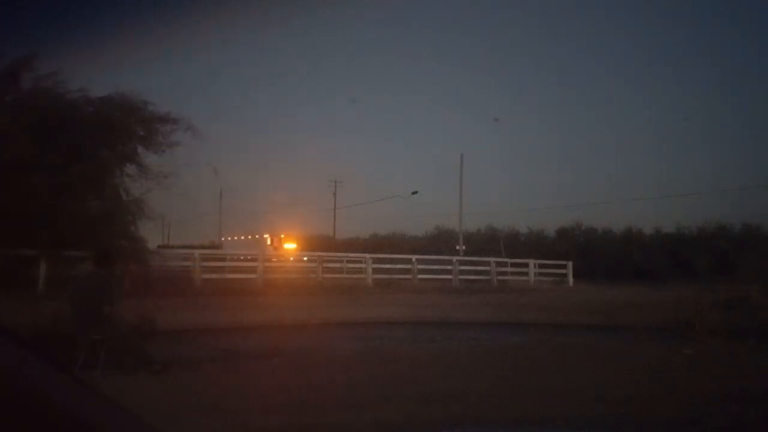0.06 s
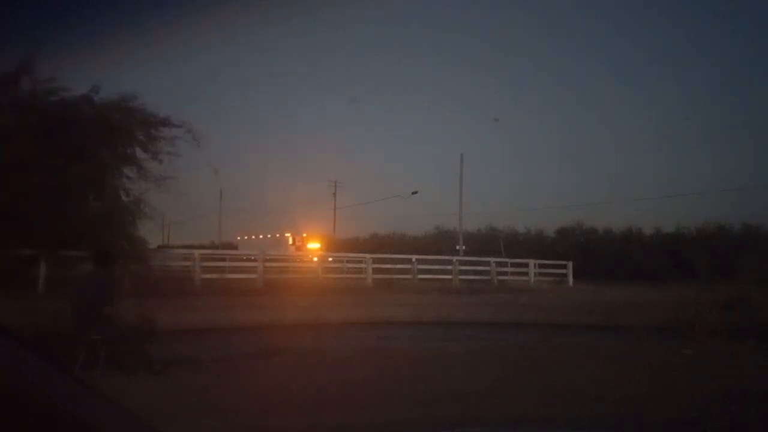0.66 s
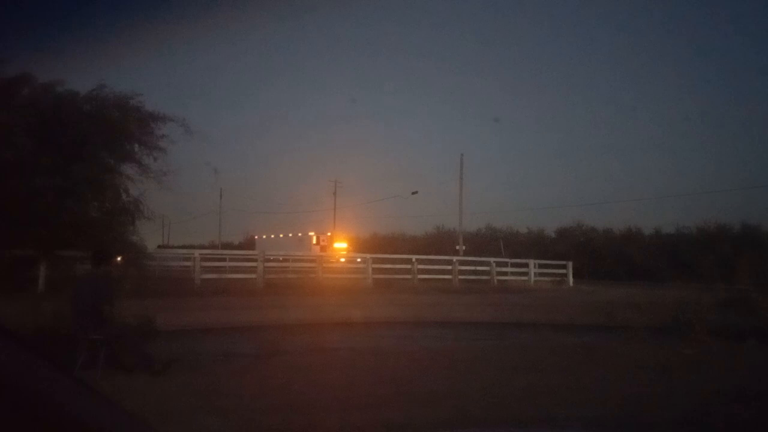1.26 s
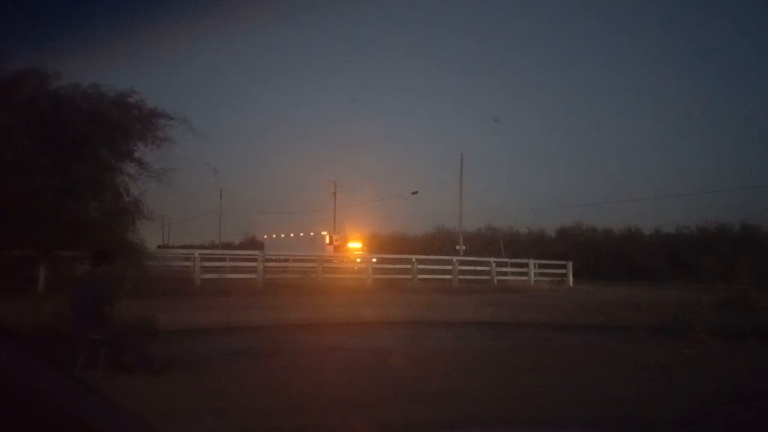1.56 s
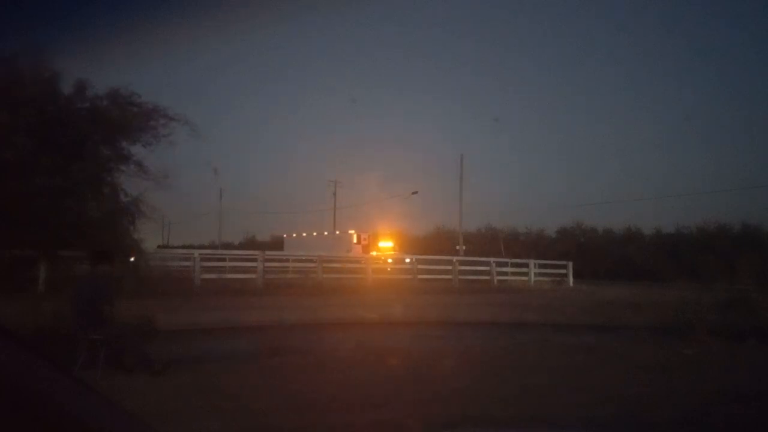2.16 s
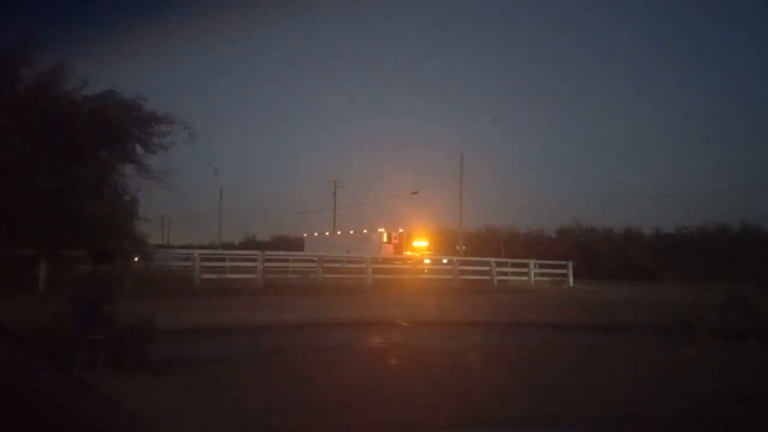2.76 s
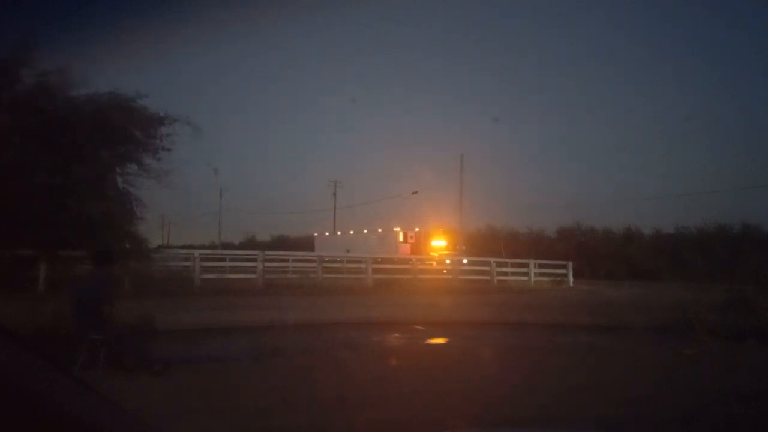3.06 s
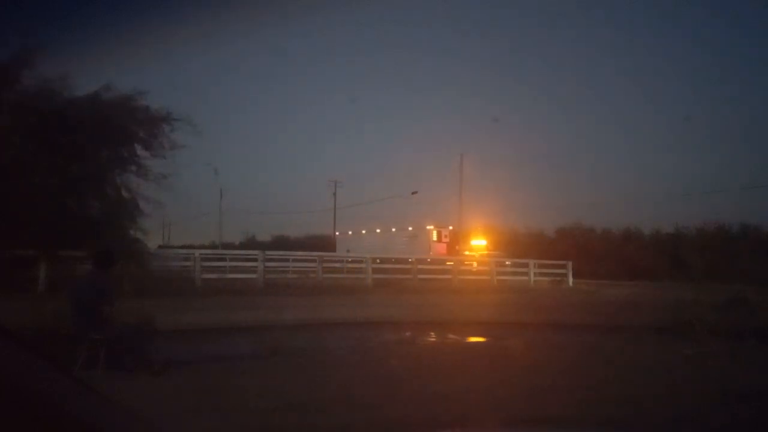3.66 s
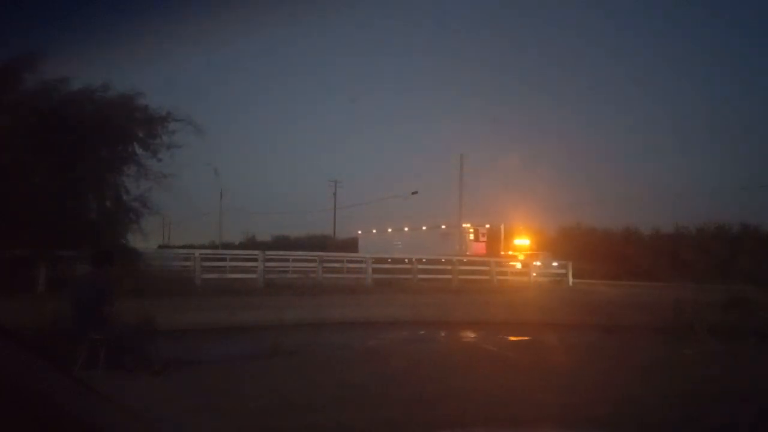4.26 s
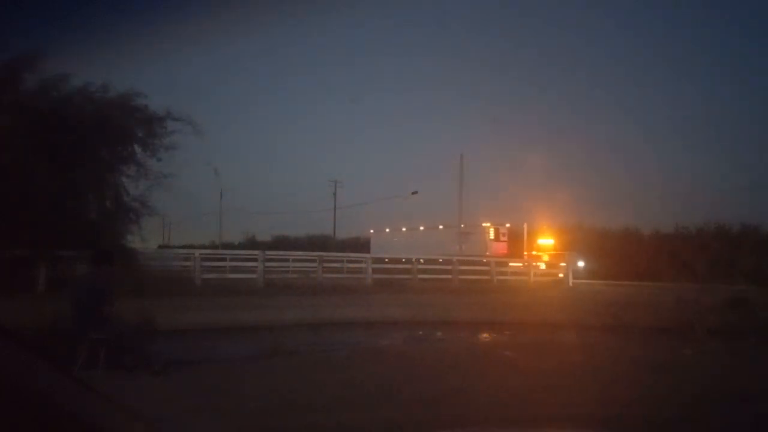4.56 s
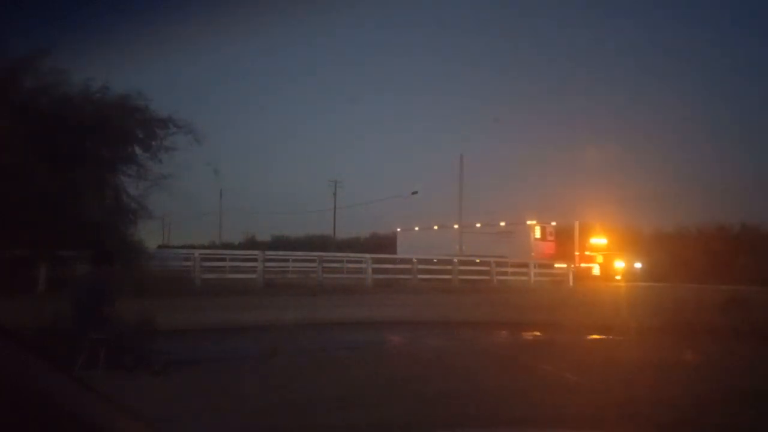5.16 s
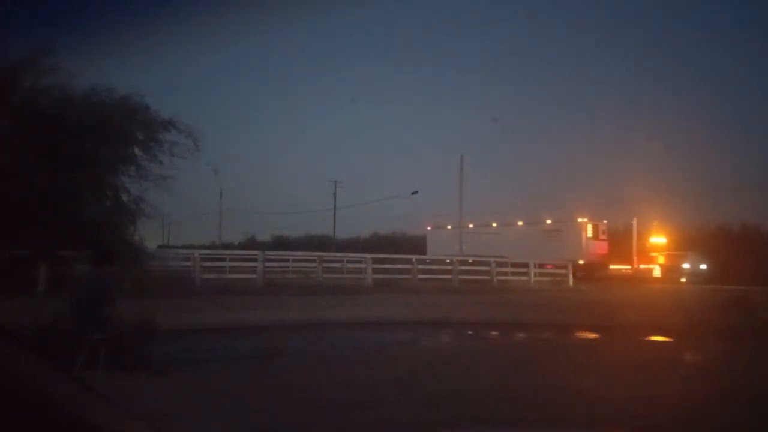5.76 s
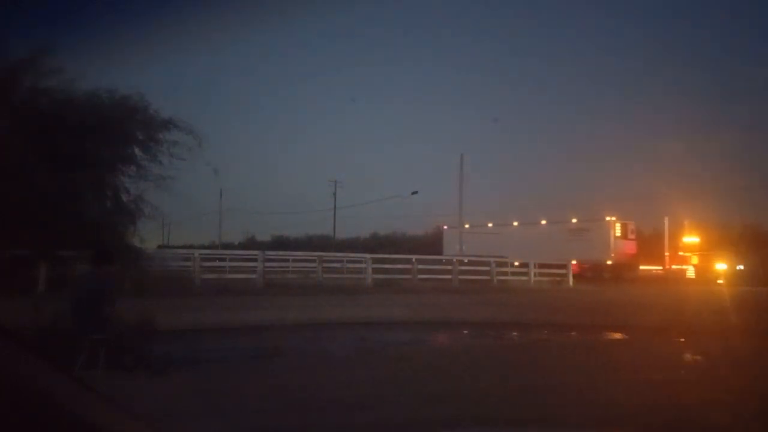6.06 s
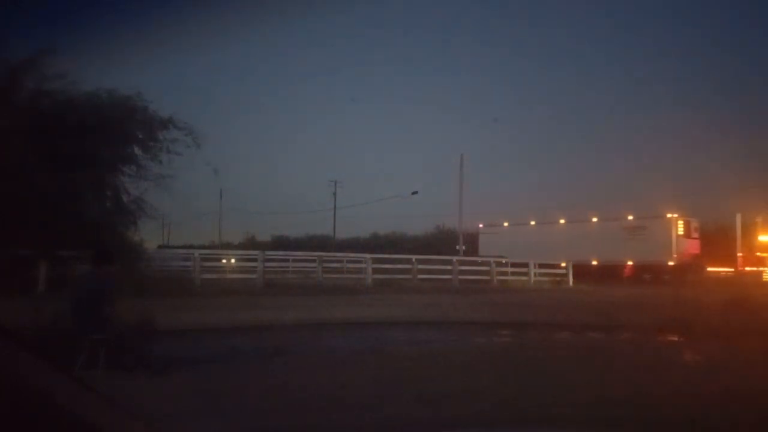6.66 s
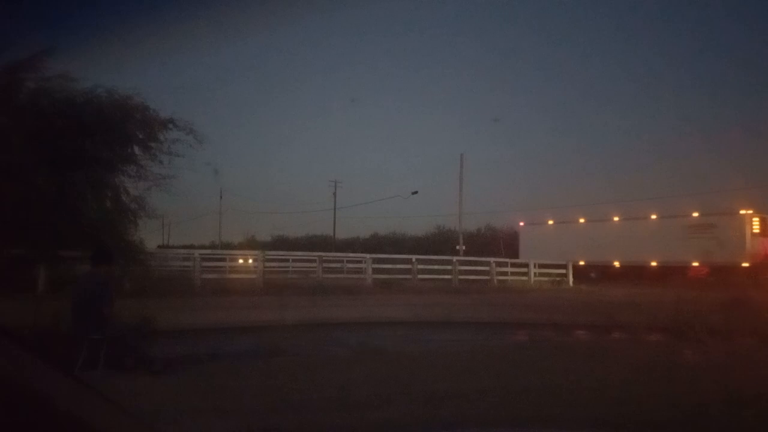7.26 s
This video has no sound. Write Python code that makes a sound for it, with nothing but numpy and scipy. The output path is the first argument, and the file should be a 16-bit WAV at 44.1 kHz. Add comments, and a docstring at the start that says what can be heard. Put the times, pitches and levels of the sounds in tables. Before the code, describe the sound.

A diesel truck approaches on a country road, its drone and tyre hiss growing over low wind rumble and faint crickets.

```python
"""Dusk beside a country road, heard from a parked car. From the start, gusts and road rumble boom in
the hollow cabin, tyres hiss, and crickets chirp faintly by rubbing their wings. At about 2 s the
diesel of a nearing lorry drones in, then fades while its tyre tread sings. From 4 s the drone returns
and grows. Near 6 s the long trailer swishes past, and the few dry ticks come more often."""
import sys
import numpy as np
from scipy import signal
from scipy.fft import rfft, irfft
from scipy.io import wavfile
from scipy.ndimage import uniform_filter1d

SR = 44100
rng = np.random.default_rng(int(sys.argv[2]) if len(sys.argv) > 2 else 0)


def file_out(sig):
    """Save sig as 16-bit WAV at sys.argv[1]."""
    # one column per channel
    cols = np.atleast_2d(sig).T
    # limit, then scale
    lim = np.clip(cols, -1, 1)
    pcm = np.round(lim * 32767).astype(np.int16)
    wavfile.write(sys.argv[1], SR, pcm)


N = 322812
TIME = np.arange(N) / SR
FREQ = np.maximum(np.arange(N // 2 + 1) * SR / N, 1)

# Tone colour of the microphone's hiss, the tyres' roar and their sizzle: f/Hz, relative level/dB
MIC_COLOUR = [(20, 16), (200, 13), (1000, 1.5), (6000, -2), (9000, -10.5), (12000, 3), (16000, 3)]
ROAR_COLOUR = [(300, -6), (700, 1), (1300, -0.5), (1700, 1), (2000, 0.5), (2500, -4.5), (3000, -9.5),
               (4500, -29.5)]
SIZZLE_COLOUR = [(1500, -6), (2800, -5), (3600, 0), (5000, -0.5), (6000, -3.5), (8000, -5), (11000, -5.5),
                 (16000, -13)]
# Chirps of nearby crickets, timed at the middle wing stroke: t/s, f/Hz, level/dB
CRICKET_CHIRPS = [(.6, 5300, -60.5), (1.36, 5080, -56), (1.59, 5370, -61), (2.05, 5370, -59),
                  (3.2, 5280, -59), (3.47, 5180, -58), (3.73, 5240, -58), (4.02, 5130, -61),
                  (4.063, 5380, -56), (4.32, 5370, -56), (4.578, 5340, -57), (5.13, 5250, -59),
                  (5.39, 5200, -59), (5.68, 5200, -58), (6.073, 5400, -59), (6.33, 5350, -59),
                  (6.567, 5373, -58), (6.77, 5130, -58), (7.01, 5370, -60), (7.21, 5130, -59),
                  (7.27, 5360, -60)]
# Dry ticks: t/s, f/Hz, width/Hz, level/dB, left over right/dB, decay/s
DRY_TICKS = [(1.619, 2700, 1510, -56, 1.5, .014), (2.159, 2200, 1800, -54, 3, .005),
             (4.103, 3500, 2200, -47, 0, .014), (4.466, 7900, 2000, -53, 7, .016),
             (6.441, 3700, 1400, -53, 2, 0.011), (6.444, 5900, 2200, -55, 5, .014),
             (6.496, 8500, 900, -55, 9, .004), (6.538, 8500, 800, -54.5, 9, .011),
             (6.726, 8500, 900, -58, 9, .004), (6.776, 8500, 900, -58, 9, 0.0039),
             (6.946, 8520, 904, -58, 9, .004), (7.058, 8500, 1100, -49, 11, 0.0041),
             (7.082, 8700, 800, -60, 10, .012), (7.143, 8400, 700, -54.5, 9, .009),
             (7.164, 8400, 900, -51.5, 9.5, .004)]
# Resonances (pitches at which the cabin's air rings) in four groups, from low to high:
# f/Hz, width/Hz, relative level/dB, left over right/dB, phase between the sides/rad
DEEP_RESONANCES = [(58.7, 43, -7.5, -1.5, 0.13), (75.4, 28, -0.5, -2.5, 0.12)]
BOOM_RESONANCES = [(105.8, 30.5, -6.5, -7, -0.31), (126.8, 33.2, -0.5, -0.5, 0.15),
                   (158.1, 36, -5.5, -1.5, -0.31)]
HUM_RESONANCES = [(206.5, 48, -3.5, -6.5, -0.84), (262, 55, 0.5, -2, -0.29), (303.3, 43.4, -1.3, 3, -0.19),
                  (363, 53, -10, -2, -2.1)]
RUSH_RESONANCES = [(417, 134, -1, -4.5, -0.8), (528, 118, -5.5, 2, 1), (649, 190, -5.5, -4, -2.5),
                   (714, 77, -16.5, -7, -0.2), (830, 300, -10.5, 5, -2), (980, 740, -7.5, -0.5, -3),
                   (1530, 1500, -24.5, 16, -0.5)]
# Wind on the car, compared with its average: t/s, level/dB
WIND_STRENGTH = [(0, 0), (.45, 0.5), (.7, 3), (1.0, -1), (1.3, -3.5), (2.15, -2), (2.45, -2), (2.7, -0.5),
                 (3.4, 2.5), (3.7, -4), (4.25, 1.5), (4.5, 0.5), (4.8, 0.5), (5.25, -1.5), (5.55, 0.56),
                 (6.1, -1), (6.8, 0.1), (7.32, -3.5)]
# The deepest rumble: t/s, level/dB
DEEP_LEVEL = [(0, -30.5), (.6, -30), (1.3, -32), (1.65, -28), (2.35, -34), (2.8, -28), (3.75, -34),
              (4.15, -26.5), (4.7, -32), (5.05, -29), (5.9, -36), (6.25, -30.5), (6.5, -34.5), (6.9, -31.5),
              (7.2, -36)]
# The boom eases as the lorry passes: t/s, level change/dB
BOOM_FADE = [(4.5, 0), (5.8, -1.4), (7.32, -2.5)]
# Single shoves of wind: t/s, half length/s, then the change in deep/dB, boom/dB, hum/dB, rush/dB
WIND_BUFFETS = [(0.252, 0.034, 8.5, 4.5, 6.5, 3), (0.567, 0.037, 0, 3, -0.5, 0),
                (0.656, 0.02, 6, 6.5, -0.5, 2.5), (0.728, 0.027, 3, 3.5, 2, 4),
                (0.815, 0.046, -1, 5.5, 1, 0), (1.01, 0.047, -8, 5.5, 1, 2),
                (1.58, 0.026, 2.5, 1, 3.5, 3.5), (2.289, 0.01, 6, 5.5, 3.5, -1),
                (2.44, 0.056, -2, 2.5, 1, 5), (2.84, 0.015, 5.5, 4, -3.5, -2),
                (3.346, 0.015, -14, 6.5, 0, -2), (3.83, 0.032, 1, -1, 8, 4.5),
                (3.909, .018, 2, 6.5, -1.5, 0), (4.064, 0.016, 3.5, 3.5, -1.5, 1),
                (4.243, 0.051, -2.5, 0, 3, 2.5), (4.37, 0.026, 10.5, -3.5, 3, 1),
                (4.658, 0.044, -0.5, 2, 2, 2.5), (4.744, .05, 3.5, 0, 0.5, 2.5),
                (5.15, 0.038, 2, 3.5, 0.5, 2.5), (5.484, 0.019, -10, 6, 4, 2.5),
                (5.69, 0.013, 7, 7.5, 2, 2.5), (6.741, 0.024, 2.5, 2.5, 5.5, 1.5),
                (6.997, 0.015, 5, 1.5, 1.5, 2), (7.283, .018, 5, 3, -1, 0)]
# Brief dips in the rumble between buffets: t/s, half length/s, level change/dB
RUMBLE_LULLS = [(.35, 0.016, -3.5), (1.144, 0.018, -5), (1.789, 0.024, -4.5), (2.325, 0.015, -10),
                (3.41, 0.012, -9), (5.038, 0.017, -4), (5.34, .035, -2), (6.428, .016, 0),
                (6.854, .018, -2), (7.105, .016, -3)]
# Broad swells of tyre noise: t/s, half length/s, roar change/dB, sizzle change/dB
TYRE_SURGES = [(0.034, 0.4, 1.4, 2.5), (3.3, 0.95, 1.7, 2.5), (5.6, 0.35, 2.5, -0.4), (7.3, 0.24, 2, 1)]
# Echoes off the cabin glass: left delay/s, right delay/s, strength as a share of the direct sound
GLASS_ECHOES = [(.0021, 0.0026, 0.088), (.0058, .0049, 0.3), (.0093, .0081, 0.071)]
# The six-cylinder diesel: t/s, firing f/Hz, level/dB
ENGINE_COURSE = [(0, 125, -54), (1.2, 122.5, -60), (2.1, 125, -37), (2.33, 124.9, -46), (2.48, 125, -33),
                 (3.1, 126.3, -58), (3.6, 125.1, -54), (4.4, 126, -36.5), (5.2, 124.9, -31),
                 (5.6, 125.1, -33), (6.0, 125.6, -30), (6.4, 126, -32), (7.0, 125.9, -30),
                 (7.32, 126.2, -27.5)]
# Tones in the exhaust: multiple of the firing rate, relative level/dB
EXHAUST_TONES = [(.5, -15), (1, 3), (2, -12), (2.5, -17), (3, -25), (4, -28)]
# The band each microphone opening swallows, left then right: f/Hz, width/Hz, level change/dB
MIC_NOTCHES = [(10070, 2800, -9), (9200, 1240, -15.5)]


def from_db(db):
    """Turn decibels into a factor to multiply by."""
    return 10 ** (np.asarray(db) / 20)


def rms_one(x):
    """Scale a signal to an average power of 1."""
    return x / np.sqrt(np.mean(x ** 2) + 1e-20)


def in_time(rows):
    """Join a table's points with straight lines, giving one curve for each column after the time."""
    times, *columns = np.transpose(rows)
    return [np.interp(TIME, times, column) for column in columns]


def swell(at_s, half_s):
    """A smooth rise and fall, 1 at its top."""
    return np.exp(-.5 * ((TIME - at_s) / half_s) ** 2)


def pan(left_db):
    """Left and right factors that make the left side louder by left_db."""
    return from_db(np.array([[.5], [-.5]]) * left_db)


def white():
    """The spectrum of fresh white noise."""
    return rfft(rng.standard_normal(N))


def resonance(hz, width_hz):
    """A filter curve that is 1 at hz and falls away on both sides."""
    return 1 / (1 + ((FREQ ** 2 - hz ** 2) / (FREQ * width_hz)) ** 2)


def drift(rate_hz):
    """A random wobble of typical size 1, mostly slower than rate_hz."""
    return rms_one(irfft(white() / (1 + (FREQ / rate_hz) ** 4), N))


def hiss_band(hz, width_hz):
    """Noise around one pitch, different in each ear."""
    return rms_one(irfft(np.array([white(), white()]) * resonance(hz, width_hz), N))


def diffuse(colour):
    """Noise from all around with the given tone colour, different in each ear."""
    hz, db = np.transpose(colour)
    gain = from_db(np.interp(np.log(FREQ), np.log(hz), db))
    return rms_one(irfft(np.array([white(), white()]) * gain, N))


def microphone_hiss(level_db=-53):
    """The microphone's own steady noise."""
    return from_db(level_db) * diffuse(MIC_COLOUR)


def crickets(stroke_s=.0047, gap_s=.0285, outer_db=-2, sag_hz_per_s=11000, rasp_hz=55, chorus_db=-69.5):
    """A chirp is three wing strokes, each falling in pitch; far crickets blur into a chorus."""
    chirps = np.zeros(N)
    rasp = 2 * np.pi * np.cumsum(rasp_hz * drift(246)) / SR
    for at_s, hz, db in CRICKET_CHIRPS:
        for stroke in (-1, 0, 1):
            centre_s = at_s + stroke * gap_s
            near = abs(TIME - centre_s) < gap_s
            t = TIME[near] - centre_s
            phase = 2 * np.pi * (hz - .5 * sag_hz_per_s * t) * t + rasp[near]
            envelope = from_db(db + outer_db * abs(stroke)) * np.exp(-.5 * (t / stroke_s) ** 2)
            chirps[near] += envelope * np.sin(phase)
    chorus = from_db(chorus_db) * hiss_band(hz=5120, width_hz=650)
    return chirps * pan(11) + chorus * pan(4.9)


def ticks(attack_s=.0019):
    """Tiny soft-edged bursts of noise that die at once."""
    out = np.zeros((2, N))
    for at_s, hz, width_hz, db, left_db, decay_s in DRY_TICKS:
        envelope = np.minimum(TIME / attack_s, 1) * np.exp(-np.minimum(TIME / decay_s, 20))
        start = int(at_s * SR)
        burst = rms_one(irfft(white() * resonance(hz, width_hz), N))
        out[:, start:] += pan(left_db) * (from_db(db) * burst * envelope)[:N - start]
    return out


def wind_whine(level_db=-55, follows_wind=.7, hz_per_db=1.5, waver_hz=8):
    """A faint, wandering whine whose pitch and loudness rise with the wind."""
    wind_db, = in_time(WIND_STRENGTH)
    bend = 2 * np.pi * np.cumsum(hz_per_db * wind_db + waver_hz * drift(2.5)) / SR
    band = hiss_band(hz=725.4, width_hz=46)[0]
    whine = np.real(signal.hilbert(band) * np.exp(1j * bend))  # slides the whole band up and down
    return from_db(level_db + follows_wind * wind_db) * whine * pan(0)


def cabin(resonances, stray_db, even_s):
    """Swirling air makes the cabin ring; each resonance reaches each side with its own level and phase."""
    ringing, power = 0, 0
    for hz, width_hz, db, left_db, phase in resonances:
        shape = from_db(db) * rms_one(resonance(hz, width_hz))
        sides = pan(left_db) * np.exp(.5j * phase * np.array([[1], [-1]]))
        ringing = ringing + white() * shape * sides
        power = power + shape ** 2
    scattered = from_db(stray_db) * np.sqrt(power) * np.array([white(), white()])
    sound = irfft(ringing + scattered, N)
    # Even out the loudness, so that the slow swells are left to the gusts.
    local_power = uniform_filter1d(np.mean(sound ** 2, axis=0), int(even_s * SR))
    return sound / np.sqrt(local_power + 1e-12)


def rumble(eddy_db=.73, eddy_hz=6, churn_db=1.53, hum_lull_share=.24):
    """Wind, buffets and small swirls swell the cabin's ringing over a deep, churning rumble."""
    wind_db, = in_time(WIND_STRENGTH)
    base_db, = in_time(DEEP_LEVEL)
    fade_db, = in_time(BOOM_FADE)
    wind_db = wind_db + eddy_db * drift(eddy_hz)
    buffets = sum(np.outer(dbs, swell(at_s, half_s)) for at_s, half_s, *dbs in WIND_BUFFETS)
    deep_db, boom_db, hum_db, rush_db = buffets
    deep_gain = from_db(base_db + deep_db + churn_db * drift(eddy_hz))
    deep = deep_gain * cabin(DEEP_RESONANCES, stray_db=-12, even_s=.22)
    # Each level is: dB in average wind + a share of the wind's change + the buffets.
    boom_gain = from_db(-28 + .78 * wind_db + boom_db + fade_db)
    boom = boom_gain * cabin(BOOM_RESONANCES, stray_db=-11, even_s=.15)
    hum = from_db(-33.5 + .6 * wind_db + hum_db) * cabin(HUM_RESONANCES, stray_db=-8.5, even_s=.16)
    rush = from_db(-40 + .94 * wind_db + rush_db) * cabin(RUSH_RESONANCES, stray_db=-3.5, even_s=.12)
    # The strongest gusts also hiss at the window.
    hiss = from_db(-61.5 + 2.2 * (wind_db + rush_db)) * hiss_band(hz=1360, width_hz=1060)
    lull_db = sum(db * swell(at_s, half_s) for at_s, half_s, db in RUMBLE_LULLS)
    return (deep + boom) * from_db(lull_db) + hum * from_db(hum_lull_share * lull_db) + rush + hiss


def glass_echoes(sound):
    """Quick bounces off the cabin glass strengthen some pitches and weaken others."""
    echoes = sum(share * np.exp(-2j * np.pi * np.outer(delays_s, FREQ))
                 for *delays_s, share in GLASS_ECHOES)
    return irfft(rfft(sound) * (1 + echoes), N)


def tyres_and_trailer(roar_db=-48.5, whir_db=-54, swish_db=-57.5, sizzle_db=-53.5, flutter_db=.61):
    """The tread roars and sizzles, and whirs as it nears; then the trailer's side swishes past."""
    surges = sum(np.outer(dbs, swell(at_s, half_s)) for at_s, half_s, *dbs in TYRE_SURGES)
    roar_surge_db, sizzle_surge_db = surges
    roar = from_db(roar_db + roar_surge_db + flutter_db * drift(20)) * diffuse(ROAR_COLOUR)
    whir = from_db(whir_db) * swell(at_s=3.38, half_s=.62) * hiss_band(hz=2040, width_hz=350)
    swish = from_db(swish_db) * swell(at_s=6, half_s=1) * hiss_band(hz=3150, width_hz=2400)
    sizzle = from_db(sizzle_db + sizzle_surge_db + flutter_db * drift(18)) * diffuse(SIZZLE_COLOUR)
    return (roar + whir + swish) * pan(1) + sizzle * pan(1.6)


def diesel(waver_hz=.71, flutter_db=1):
    """The firing cylinders make the exhaust drone, which wavers in the moving air."""
    firing_hz, level_db = in_time(ENGINE_COURSE)
    phase = 2 * np.pi * np.cumsum(firing_hz + waver_hz * drift(4.9)) / SR
    drone = sum(from_db(db) * np.sin(multiple * phase + rng.uniform(0, 2 * np.pi))
                for multiple, db in EXHAUST_TONES)
    flutter = from_db(flutter_db * drift(2.4))
    return rms_one(drone * flutter) * from_db(level_db) * pan(-1.3)


def scene():
    """Wind, lorry, crickets and ticks over the hiss of the microphone."""
    wind = rumble() + wind_whine()
    lorry = diesel() + glass_echoes(tyres_and_trailer())
    return wind + lorry + crickets() + ticks() + microphone_hiss()


def record(dry):
    """Each microphone opening swallows a band of treble; the lowest bass and the very top are cut."""
    low_cut_hz, high_cut_hz, fade_s = 40, 15750, .004
    notch = from_db([db / (1 + (2 * (FREQ - hz) / width_hz) ** 2) for hz, width_hz, db in MIC_NOTCHES])
    high_pass = 1 / np.sqrt(1 + (low_cut_hz / FREQ) ** 8)
    low_pass = 1 / np.sqrt(1 + (FREQ / high_cut_hz) ** 300)
    fade = np.minimum(np.minimum(TIME, TIME[::-1]) / fade_s, 1)
    return irfft(rfft(dry * fade) * notch * high_pass * low_pass, N)


dry = scene()
out = record(dry)
file_out(out)
```